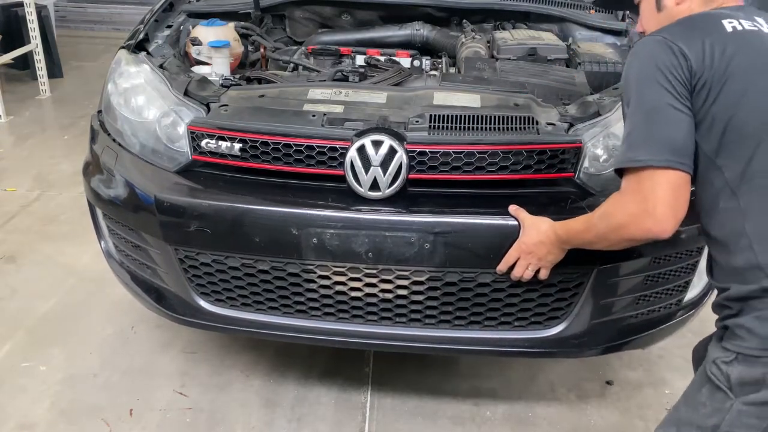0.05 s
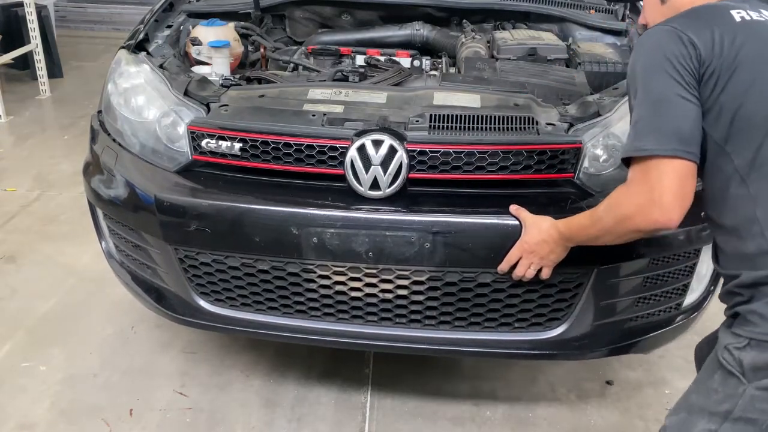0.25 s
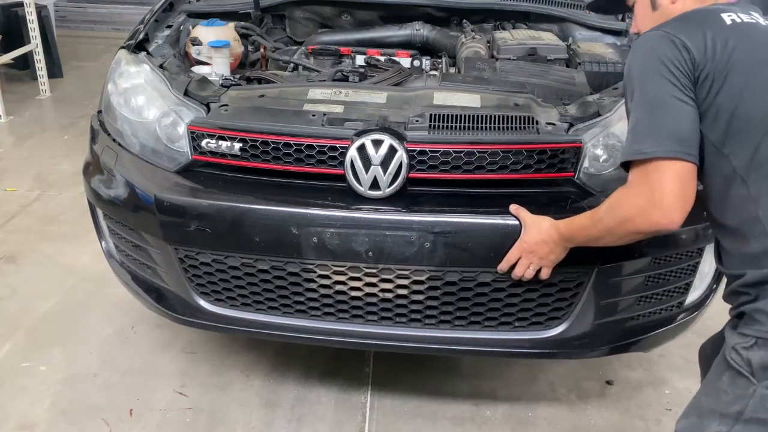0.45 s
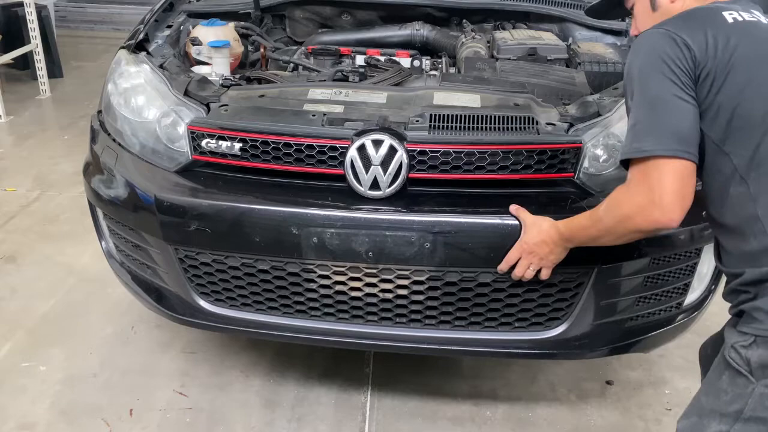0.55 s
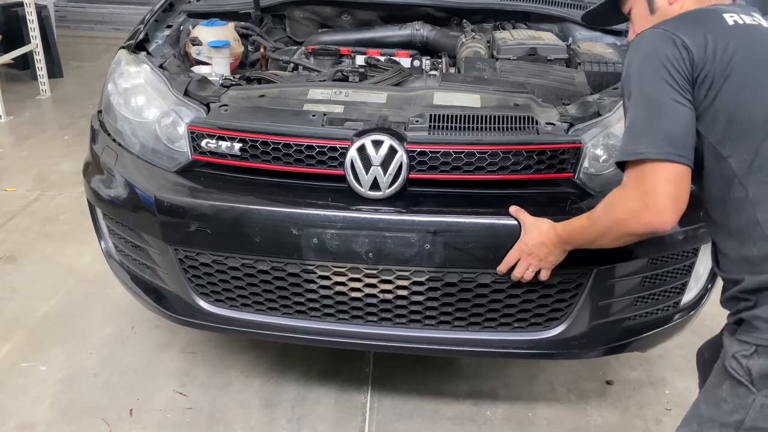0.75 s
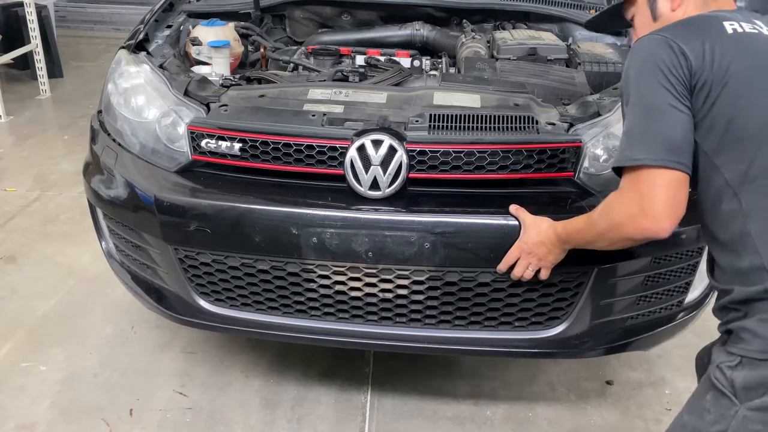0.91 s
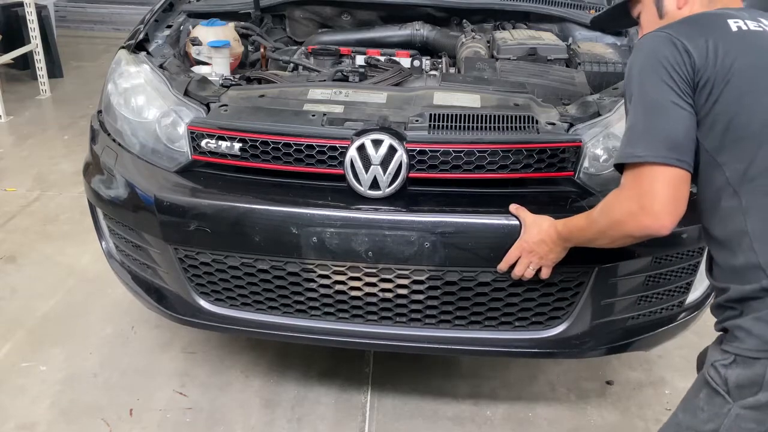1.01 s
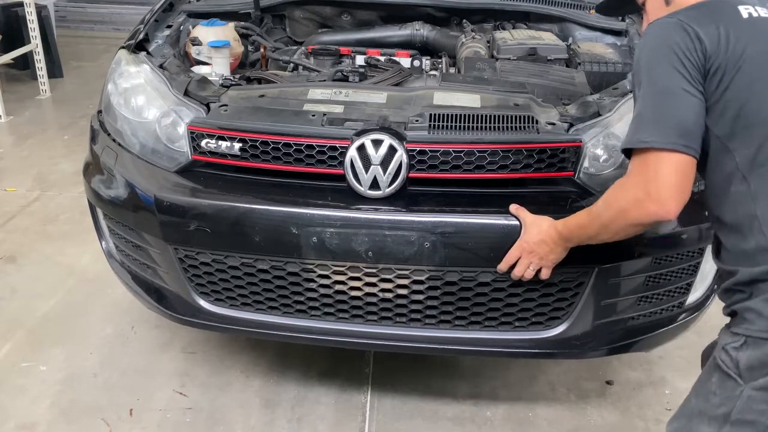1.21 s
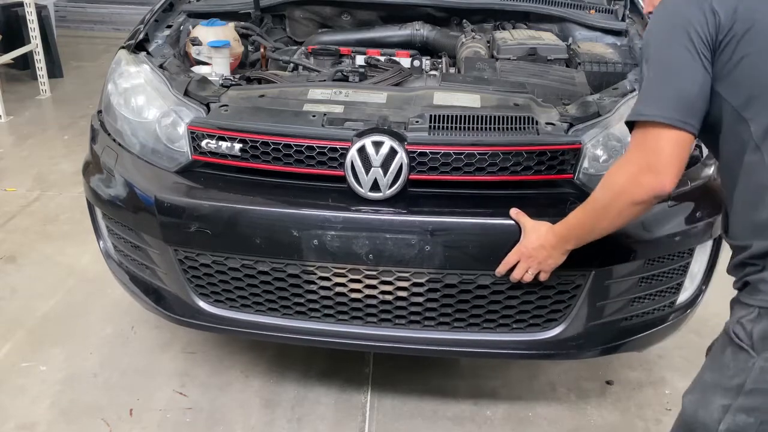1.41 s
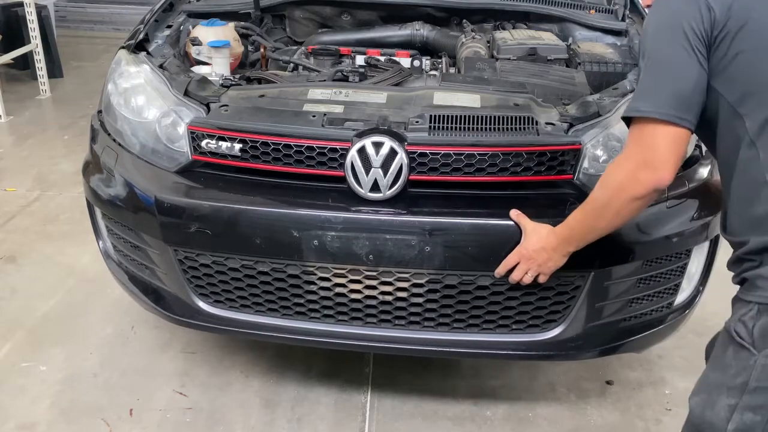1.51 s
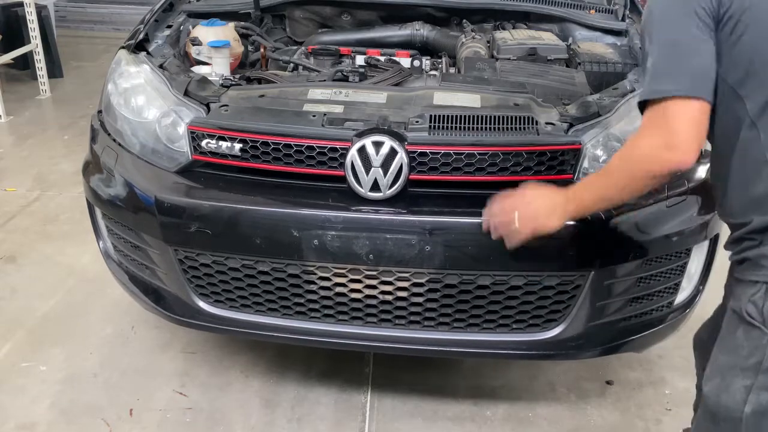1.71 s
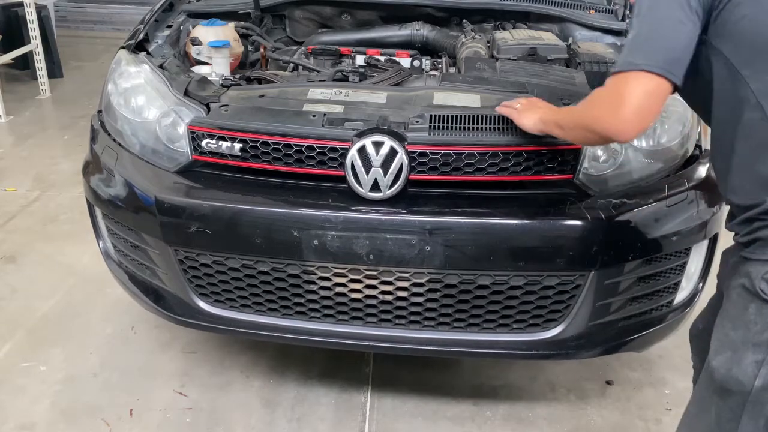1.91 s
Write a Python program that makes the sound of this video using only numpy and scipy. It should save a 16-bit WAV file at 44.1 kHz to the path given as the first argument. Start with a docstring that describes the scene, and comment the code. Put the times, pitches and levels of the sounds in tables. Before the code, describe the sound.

Plastic car bumper cover snaps loose with a loud crack, then knocks and clatters in a workshop

```python
"""A plastic bumper cover is worked loose by hand in a hard-walled workshop, over a faint floor of shaped noise.
Faint knocks (struck panel modes) and ticks (rattled clip modes) lead to a snap at 0.24 s that overloads the input.
The flexing panel rumbles and scuffs throughout (random slips through the same modes); rumble swells near 0.23,
0.66 and 1.43 s, scuff near 0.4 and 1.43 s. More knocks follow, hard at 0.96 s and in a flurry from 1.39 to 1.5 s;
sparse ticks end it. Close echoes and a longer hall tail (decaying noise) follow every blow."""
import sys
import numpy as np
from scipy import signal
from scipy.fft import rfft, irfft
from scipy.io import wavfile

SR = 44100
rng = np.random.default_rng(int(sys.argv[2]) if len(sys.argv) > 2 else 0)


def invert_db(x):
    """Field ratio 10**(x/20) for x, a level in decibels (scalar or array-like)."""
    u = np.asarray(x, float) / 20
    return 10 ** u


def inscribe(sig):
    """Save sig as 16-bit PCM at rate SR to the path in sys.argv[1].

    A 1-D sig is mono; a 2-D sig holds one channel per row.
    Samples are clipped to [-1, 1] before scaling.
    """
    pcm = np.round(np.clip(np.atleast_2d(sig).T, -1, 1) * 32767)
    wavfile.write(sys.argv[1], SR, pcm.astype(np.int16))


N = 85995

# panel modes: f/Hz, level/dB
PANEL_MODES = [(78, -19.5), (104, -16), (178, -13.5), (227, -2), (289, -2.5), (335, -1), (440, 3),
               (520, -0.5), (615, 1), (735, 2.5), (850, 0.5), (945, -4.5), (1045, -8), (1440, -15.5)]
# broad resonances of clips and grille: f/Hz, level/dB
CLIP_MODES = [(1000, -15), (1500, -15), (1950, -13.5), (2500, -5.5), (3000, -1), (3500, 1), (4300, -1),
              (5550, -3), (7300, -2.5), (9200, -4), (11300, -6), (14000, -12)]
CLIP_PIVOT_HZ, CLIP_T60_SLOPE = 4000, -0.56  # slope: power of frequency


def table(rows):
    """Columns of a table."""
    return np.array(rows, float).T


def conv(a, b):
    """Convolution cut to N samples."""
    return signal.fftconvolve(a, b)[:N]


def log_bins():
    """Log frequency of the rfft bins, counted from one to avoid log 0."""
    return np.log(np.arange(1, N // 2 + 2) * SR / N)


def highpass(x, order, hz):
    """Butterworth high-pass."""
    return signal.sosfilt(signal.butter(order, hz, "high", fs=SR, output="sos"), x)


def add(out, start_s, x, peak_db):
    """Mix x in at start_s, its peak scaled to peak_db."""
    i = int(start_s * SR)
    out[i:i + len(x)] += (x * invert_db(peak_db) / np.abs(x).max())[:N - i]


def ring(modes, pivot_hz, t60_s, slope, tilt_db, scatter_db=0., chance=(0, 0), favoured_hz=None):
    """Struck body: decaying sines, each with its own gain and detune; t60_s holds at pivot_hz.

    Neighbouring modes oppose in sign; a favoured mode puts all in step and is lifted."""
    detune = .015  # rms, fraction of f
    favour_db, favour_oct = 7.5, .17
    hz, db = table(modes)
    t = np.arange(int(.2 * SR))[:, None] / SR
    gain = invert_db(db + scatter_db * chance[0] + tilt_db * np.log2(hz / pivot_hz))
    if favoured_hz:
        distance = np.log2(hz / favoured_hz) / favour_oct
        gain = gain * invert_db(favour_db * np.exp(-distance ** 2))
    else:
        gain = gain * (-1.) ** np.arange(len(hz))
    sines = np.sin(2 * np.pi * hz * (1 + detune * chance[1]) * t)
    decay = np.exp(-np.log(1000) * t / (t60_s * (hz / pivot_hz) ** slope))
    return (sines * decay) @ gain


def rattle(noise, decay_ms):
    """Contact chatter: noise with an exponential decay."""
    return noise * np.exp(-np.arange(len(noise)) / SR * 1000 / max(decay_ms, .1))


def floor():
    """Steady air and distant machinery: Gaussian noise shaped in frequency."""
    # floor spectrum: f/Hz, relative level/dB
    floor_rows = [(15, -35.5), (25, -18.5), (92, 9.5), (317, 0.5), (1130, -17), (1400, -14), (2110, -27.5),
                  (2350, -24.5), (5570, -22.5), (16000, -41)]
    rms_db = -55
    hz, db = table(floor_rows)
    shape = invert_db(np.interp(log_bins(), np.log(hz), db))
    x = irfft(rfft(rng.standard_normal(N)) * shape, N)
    return x / x.std() * invert_db(rms_db)


def hall(x):
    """Diffuse tail: overlapping bands of noise, each dying at its own rate."""
    # hall bands: f/Hz, level/dB, t60/s
    hall_rows = [(100, -15, 0.17), (253, -6, 0.38), (585, -20, 0.65), (1420, -15.5, 0.44),
                 (3200, -23.5, 0.9), (7560, -21.5, 0.84), (10100, -14, 0.8), (11210, -14.5, 0.41),
                 (14000, -26, .5)]
    delay_s, rise_ms = .0065, 2.5
    late_s = np.maximum(np.arange(N) / SR - delay_s, 0)
    spectrum = rfft(rng.standard_normal(N))
    log_hz = np.log(table(hall_rows)[0])
    tail = 0
    for (_, db, t60_s), share in zip(hall_rows, np.eye(len(hall_rows))):
        decay = np.exp(-np.log(1000) * late_s / t60_s)
        env = decay * (1 - np.exp(-late_s * 1000 / rise_ms))
        band = irfft(spectrum * np.interp(log_bins(), log_hz, share), N)
        tail = tail + band * env * invert_db(db) / np.sqrt(np.sum(env ** 2))
    return conv(x, tail)


def near(x):
    """Dense close echoes from the floor and engine bay: a short decaying noise tail."""
    energy_db, t60_s = -9, .04
    n = SR // 4
    tail = rng.standard_normal(n) * np.exp(-np.log(1000) * np.arange(n) / SR / t60_s)
    return conv(x, tail * invert_db(energy_db) / np.sqrt(np.sum(tail ** 2)))


def panel(*how):
    """Panel modes driven by a soft half-sine contact; higher modes die sooner."""
    pivot_hz, t60_s, t60_slope, contact_ms = 300, 0.078, -0.76, 0.35
    force = np.sin(np.pi * np.minimum(np.arange(256) / (contact_ms * SR / 1000), 1))
    return np.convolve(ring(PANEL_MODES, pivot_hz, t60_s, t60_slope, *how), force)


def clips(*how):
    """Small hard parts: short, broad resonances."""
    t60_s = 0.0035
    return ring(CLIP_MODES, CLIP_PIVOT_HZ, t60_s, CLIP_T60_SLOPE, *how)


def grains(per_s, mean_size_db, body, time_s, rms_db):
    """Random slips, sizes exponential in dB and either sign, ring a body under a level curve."""
    c = rng.random((N, 3))
    happens = c[:, 0] < per_s / SR
    size = invert_db(-mean_size_db * np.log(1 - c[:, 1]))
    sign = np.sign(c[:, 2] - .5)
    x = conv(happens * size * sign, body)
    return x / x.std() * invert_db(np.interp(np.arange(N) / SR, time_s, rms_db))


def flexing():
    """The loaded panel slips on its mounts: dull rumble in the panel, fine scuff in the clips."""
    # hand load on the panel: t/s, rumble level/dB, scuff level/dB
    flex_rows = [(0, -72, -80), (.07, -69, -84), (.125, -42.5, -60), (.18, -55.5, -72), (.23, -37, -57),
                 (.4, -55, -47.5), (.6, -63, -53), (.66, -39, -51.5), (.74, -47, -59.5), (.9, -70.5, -64.5),
                 (1.02, -55.5, -58.5), (1.09, -54.5, -69.5), (1.19, -47.5, -69), (1.26, -59.5, -97.5),
                 (1.37, -56.5, -63), (1.43, -31.5, -44.5), (1.52, -38.5, -56.5), (1.63, -60, -71),
                 (1.69, -51.5, -67), (1.76, -50.5, -68), (1.85, -74, -81), (1.95, -63, -73)]
    time_s, rumble_db, scuff_db = table(flex_rows)
    rumble_tilt_db, scuff_tilt_db = -3.5, -4  # per octave
    rumble = grains(700, 2.5, panel(rumble_tilt_db), time_s, rumble_db)
    scuff = grains(1800, 1.5, clips(scuff_tilt_db), time_s, scuff_db)
    return rumble + scuff


def knocks():
    """Blows on the panel: one impulse plus brief chatter rings its modes, one mode favoured."""
    # knocks on the mounts: t/s, peak before high-pass/dB, tilt/(dB/octave), favoured f/Hz
    knock_rows = [(0.087, -40, 1, 615), (0.1241, -38, -7, 335), (0.199, -19, -2, 227),
                  (.214, -25.5, 4, 945), (0.244, -10.5, 11.5, 990), (.249, -6.5, 1, 615),
                  (0.479, -36, 1, 227), (0.648, -33, 3, 450), (0.67, -22, -4, 178), (0.684, -19, -2.5, 335),
                  (.698, -27.5, -3, 227), (0.756, -39, -13, 289), (0.8306, -29, -7, 615),
                  (0.857, -28.5, 7, 960), (0.9617, -9, -5.5, 229.4), (.978, -20, -5, 226),
                  (0.9935, -17, -6, 945), (1.007, -21, 4, 227), (1.1193, -44, -5.5, 443),
                  (1.1933, -34.5, 2, 227), (1.283, -34, 1, 520), (1.389, -13, 1, 430), (1.4, -31, -12, 335),
                  (1.413, -34, -8, 337), (1.4433, -14, 2.5, 440), (1.456, -17.5, -4.5, 333),
                  (1.474, -20.5, 0, 227), (1.499, -25, -15, 735), (1.554, -32, -7, 285.5),
                  (1.7706, -26, 2.5, 1050), (1.81, -34.5, -6.5, 335)]
    scatter_db, chatter_db, settle_ms = 1.5, -24.5, 8.2
    blow_low_hz = 150  # a blow on one spot moves little air below this
    out = np.zeros(N)
    chances = rng.standard_normal((len(knock_rows), 2, len(PANEL_MODES)))
    noises = rng.standard_normal((len(knock_rows), 1024))
    for (start_s, peak_db, tilt_db, hz), chance, noise in zip(knock_rows, chances, noises):
        strike = np.r_[1, invert_db(chatter_db) * rattle(noise, settle_ms)]
        add(out, start_s, conv(panel(tilt_db, scatter_db, chance, hz), strike), peak_db)
    return highpass(out, 2, blow_low_hz)


def crest(x):
    """Peak over root energy."""
    return np.abs(x).max() / np.sqrt(np.sum(x ** 2))


def ticks():
    """Short dying rattles ring the clips; the snap is the hardest and rings on.

    Returns the sound towards the microphone and, at equal energy per tick, the smoother
    average over all directions that fills the hall."""
    # tabs and clips ticking: t/s, peak/dB, tilt/(dB/octave), rattle decay/ms
    tick_rows = [(0.0832, -35, -6.5, 2.4), (0.1092, -40, -9, 13), (0.1233, -37, -9, 3.9),
                 (0.2002, -32.5, -10, 3.0), (0.671, -26.5, -6.5, 5), (0.854, -33, -1.5, 3.1),
                 (0.961, -23.5, -3.5, 7.2), (0.967, -23, -3.5, 4.8), (0.9926, -32.5, -7.5, 7.8),
                 (1.0251, -44, -8.5, 5.7), (1.1506, -38.5, 1, 4.6), (1.286, -42, -6.5, 2.3),
                 (1.338, -50, -3, 3.0), (1.3454, -28.5, 4, 2.9), (1.3904, -19.5, -6.5, 4.5),
                 (1.3986, -27.5, -1.5, 9), (1.4098, -26.5, -9.5, 9), (1.4443, -22.5, -6.5, 1.85),
                 (1.4626, -30, -6, 12), (1.4756, -29.5, -2.0, 3.8), (1.4926, -32, -11.5, 6.5),
                 (1.5604, -38.5, -4, 1.7), (1.6881, -46, 0, 3.2), (1.7358, -51, 1, 2.6),
                 (1.807, -46, 0.5, 4.6), (1.902, -53, 0, 4.5)]
    snap_row = (.2438, 12, -2, 3.5)
    scatter_db = 2.2
    snap_ring_db, snap_ring_t60_s = -5.5, .05
    rows = [snap_row] + tick_rows
    out, around = np.zeros(N), np.zeros(N)
    chances = rng.standard_normal((len(rows), 2, len(CLIP_MODES)))
    noises = rng.standard_normal((len(rows), 2048))
    for (start_s, peak_db, tilt_db, decay_ms), chance, noise in zip(rows, chances, noises):
        direct = conv(clips(tilt_db, scatter_db, chance), rattle(noise, decay_ms))
        mean = clips(tilt_db)
        add(out, start_s, direct, peak_db)
        add(around, start_s, mean, peak_db + 20 * np.log10(crest(mean) / crest(direct)))
    # the freed clip rings on in four middle modes
    freed = ring(CLIP_MODES[3:7], CLIP_PIVOT_HZ, snap_ring_t60_s, CLIP_T60_SLOPE, 0)
    add(out, snap_row[0], freed, snap_ring_db)
    return out, around


def scene():
    """Bumper, close echoes, hall and floor, summed to one channel."""
    low_hz = 60  # the panel is too small to radiate below this
    body = knocks() + flexing()
    hard, around = ticks()
    body = highpass(body, 4, low_hz)
    return (body + hard + near(body + hard) + hall(body + around) + floor())[None]


def band_limit(x):
    """A steep low-pass at the top of the band."""
    return signal.sosfilt(signal.butter(12, 16460, fs=SR, output="sos"), x)


def record(dry):
    """The input saturates smoothly on loud peaks, then a steep low-pass cuts the top."""
    overload, knee, top_hz = .57, 5., 15600  # overload: amplitude limit
    x = dry / (1 + np.abs(dry / overload) ** knee) ** (1 / knee)
    x = signal.sosfilt(signal.ellip(6, .2, 40, top_hz, fs=SR, output="sos"), x)
    return band_limit(x)


dry = scene()
out = record(dry)
inscribe(out)
```